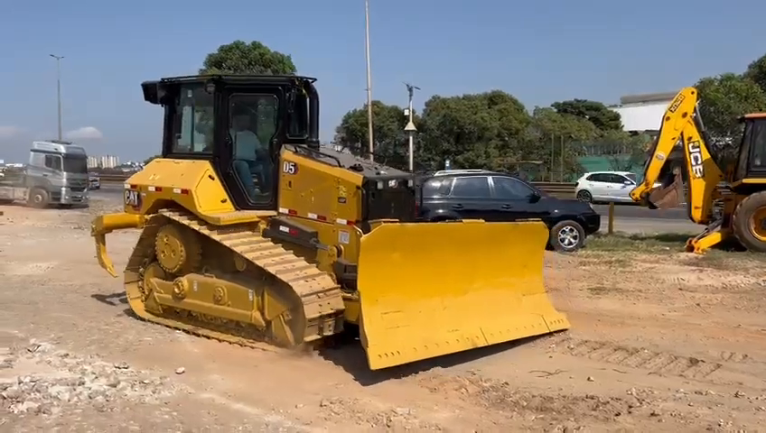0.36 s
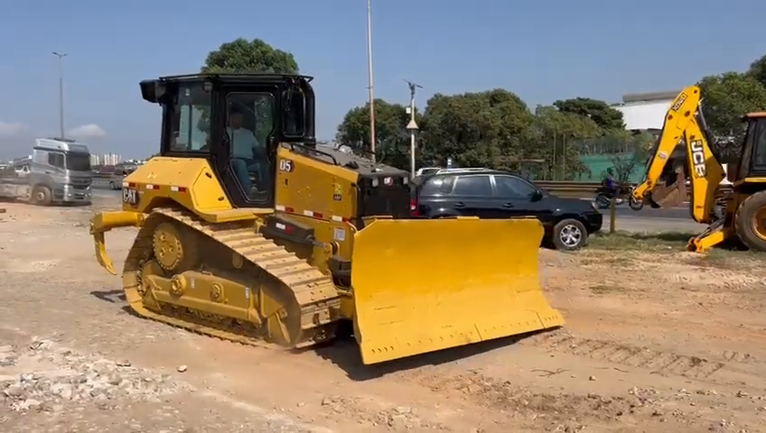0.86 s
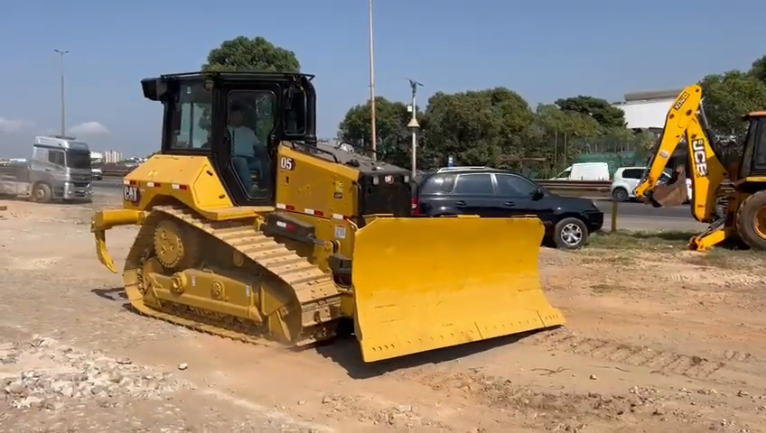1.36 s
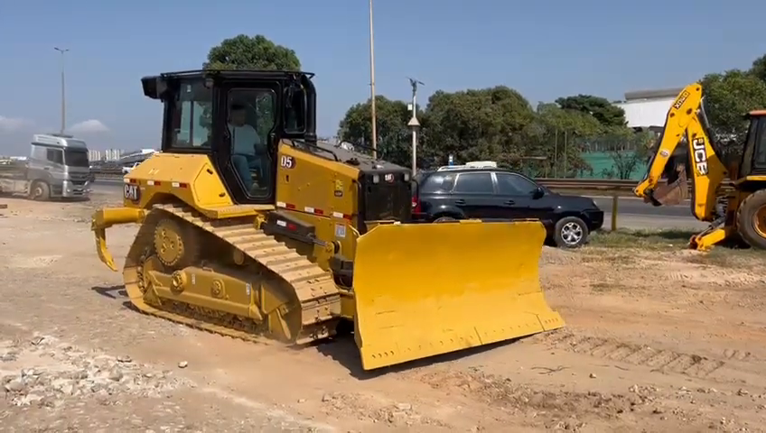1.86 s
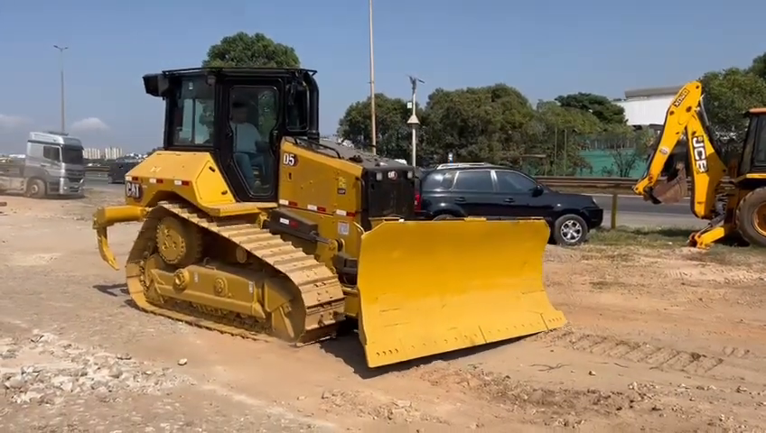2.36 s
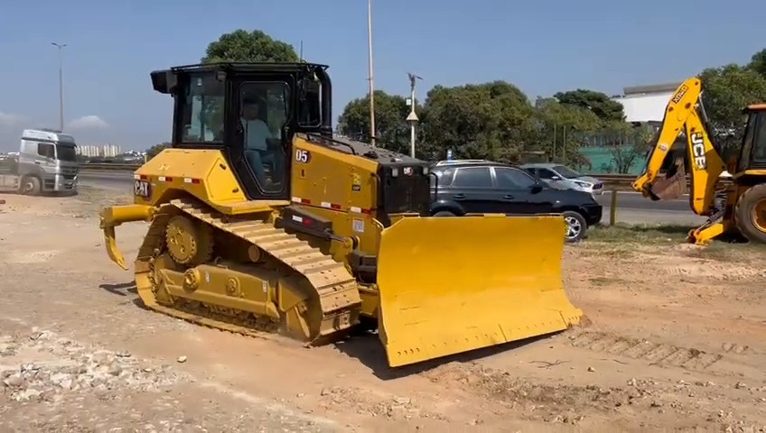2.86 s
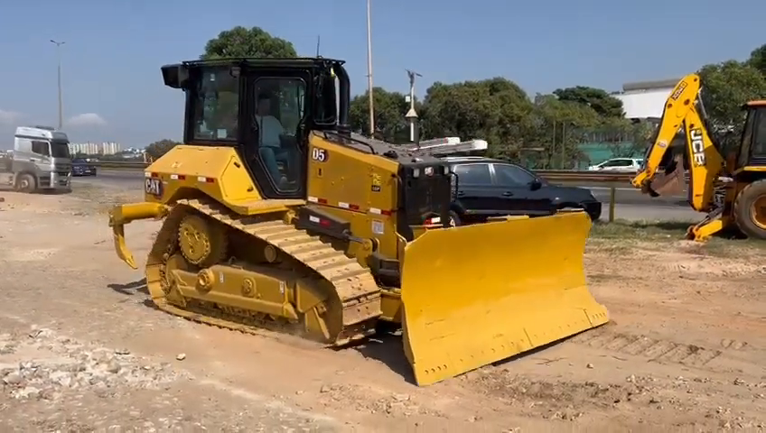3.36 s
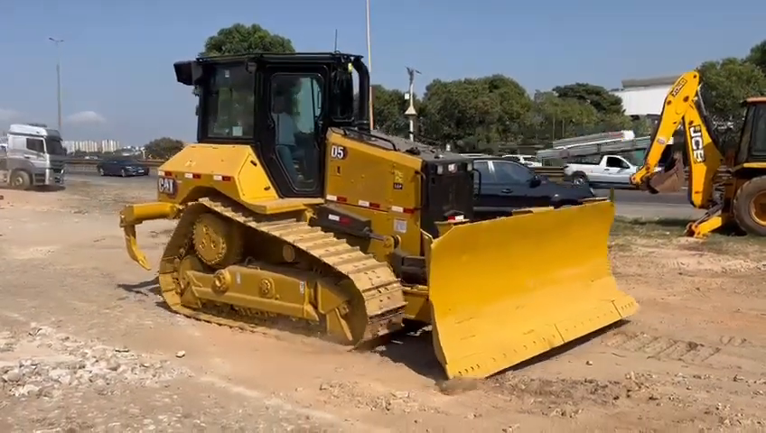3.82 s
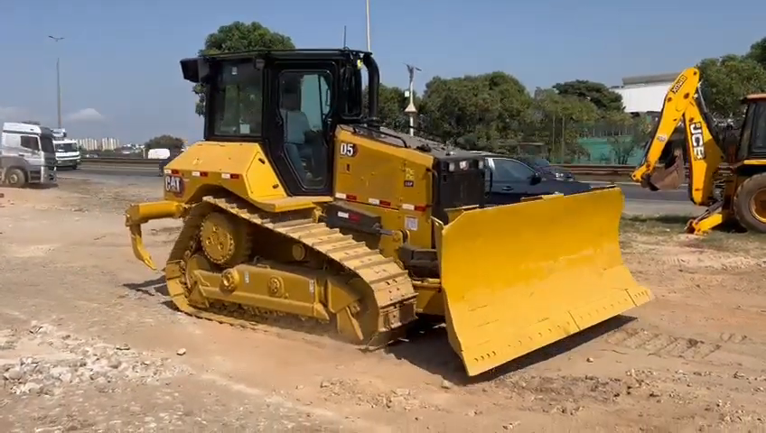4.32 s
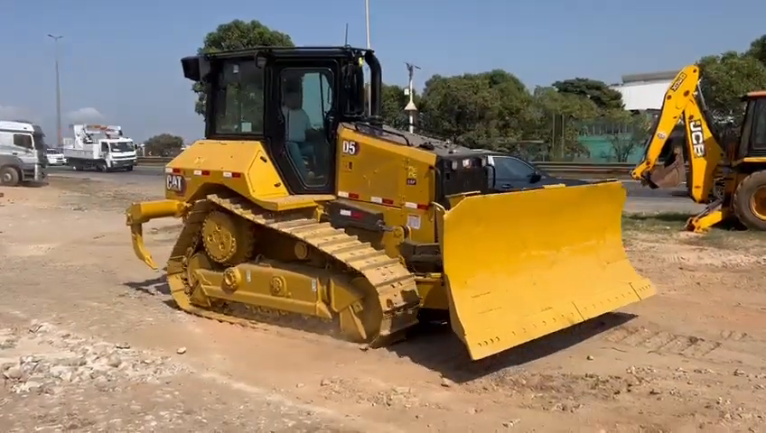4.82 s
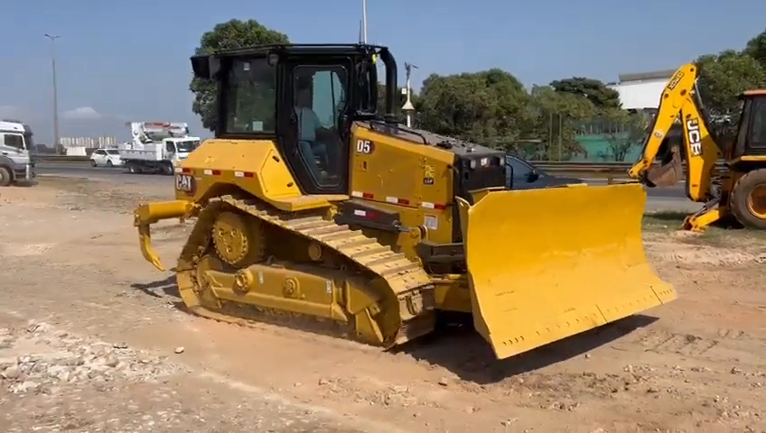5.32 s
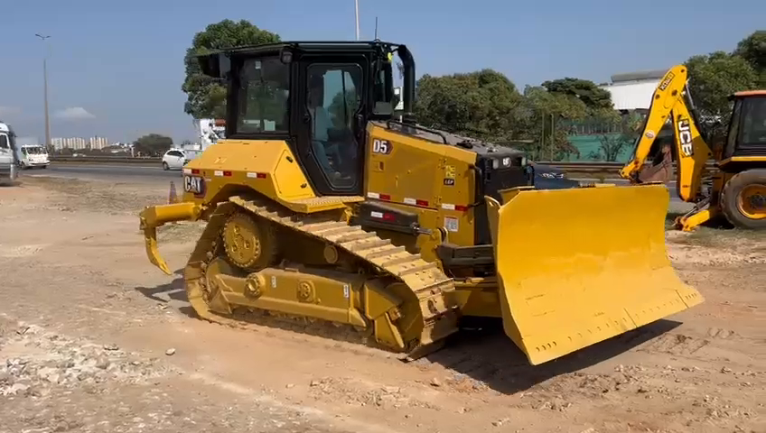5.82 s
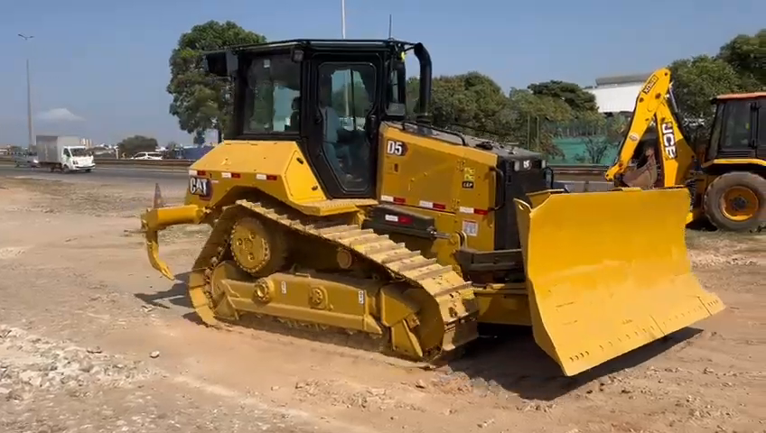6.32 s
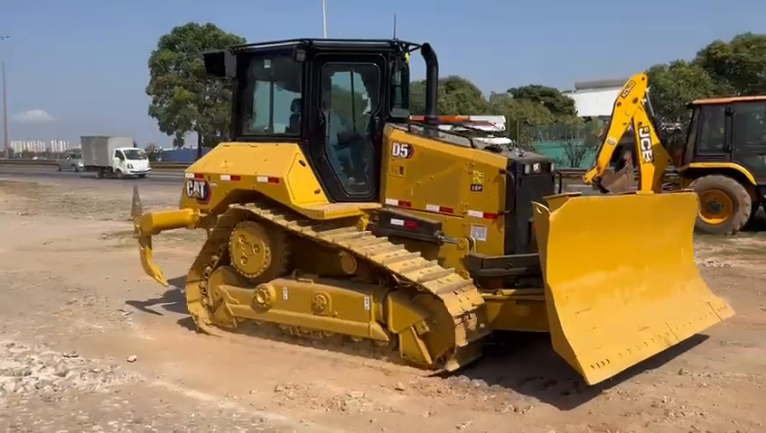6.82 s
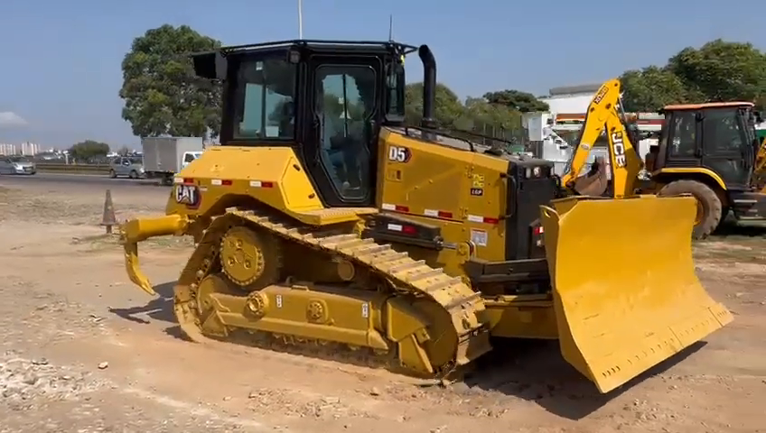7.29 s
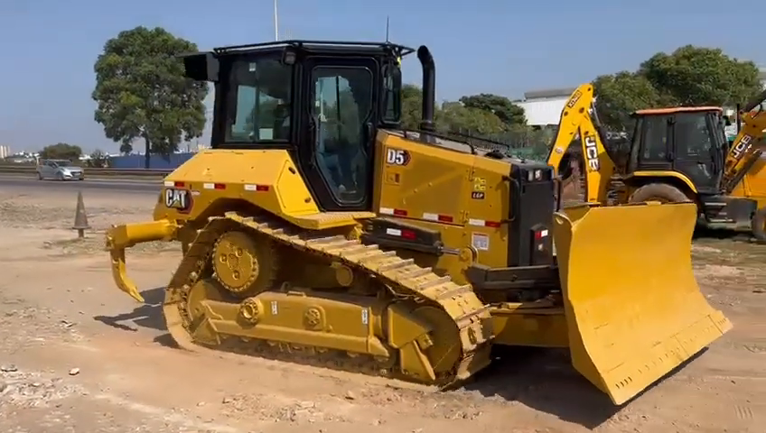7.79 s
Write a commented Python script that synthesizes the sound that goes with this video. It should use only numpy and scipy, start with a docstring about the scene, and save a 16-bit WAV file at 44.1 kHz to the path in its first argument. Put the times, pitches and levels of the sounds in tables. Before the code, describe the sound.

A tracked dozer works on an open dirt yard, heard in stereo from some metres away. From 0 s its diesel roars at high revs with a buzzing gear whine, thin turbo whistle and a couple of light track clicks. At about 1.1 s it surges briefly, then the pitch slides down until 2 s, exhaust beat thinning; a dull thud lands at 1.7 s. From 2.2 s the engine pulls at a steady, lower, rough growl over ground rumble and hiss. Around 3 s track links clank and chirp in a cluster; at 3.6-4 s a dry pin squeals amid hard clanks, low thuds and hydraulic whine, with hiss and rasping fading by 5 s. Knocks and a sharp stone crack come at 5.9-6.5 s. Gear whine returns, small squeaks sound near 7.7 s, a tiny air puff at 7.9 s, and the engine continues to the end.

```python
"""On a dirt yard, a tracked dozer with a six-cylinder turbo diesel manoeuvres some metres away.
The engine drops from high revs, settles and pulls: sines at multiples of its firing rate over a noise roar.
Pumps and gears sing on the same phase; a turbo whistles on its own. Track links clank as struck modes,
dry pins squeal and squeak as sliding sines, panels ring as resonances in noise, stones snap as
filtered clicks, and the frame thuds as decaying sine and noise bursts."""
import sys
import numpy as np
from scipy import signal
from scipy.fft import rfft, irfft, next_fast_len
from scipy.io import wavfile
from scipy.ndimage import uniform_filter1d

SR = 44100
rng = np.random.default_rng(int(sys.argv[2]) if len(sys.argv) > 2 else 0)


def materialize(psi):
    """Save the field psi as 16-bit PCM at rate SR to the path in sys.argv[1].

    A 1-D psi becomes a single channel; in a 2-D psi each row is a channel.
    """
    bounded = np.clip(np.atleast_2d(psi).T, -1, 1)
    quanta = np.round(bounded * 32767).astype(np.int16)
    wavfile.write(sys.argv[1], SR, quanta)


def invert_db(x):
    """Field ratio 10**(x/20) for x, a level in decibels (scalar or array-like)."""
    u = np.asarray(x, float) / 20
    return 10 ** u


N = 360297


def rms_one(x):
    """Normalisation: scales a signal to unit root mean square."""
    return x / np.sqrt(np.mean(x ** 2) + 1e-20)


def in_time(rows, fade_s=0.03):
    """Linear interpolation: each column at every sample, then a gate that is open while the curve lasts."""
    s, *columns = np.transpose(rows)
    t = np.arange(N) / SR
    gate = np.clip(np.minimum(t - s[0], s[-1] - t) / fade_s + 1, 0, 1)
    return [np.interp(t, s, c) for c in columns] + [gate]


def at_hz(points, hz):
    """Logarithmic pitch: interpolates a curve of (frequency [Hz], value) along log frequency."""
    points = np.array(points)
    return np.interp(np.log(hz + 1), np.log(points[:, 0] + 1), points[:, 1])


def band_pass(order, edges_hz, x):
    """Butterworth filtering: passes the band between two edges."""
    return signal.sosfilt(signal.butter(order, edges_hz, "band", fs=SR, output="sos"), x)


def low_pass(order, edge_hz, x):
    """Butterworth filtering: passes what lies below the edge."""
    return signal.sosfilt(signal.butter(order, edge_hz, fs=SR, output="sos"), x)


def drift(rate):
    """Low-passed chance: noise through a double pole at rate [Hz], spread 1, drawn every 40 samples."""
    r = np.exp(-80 * np.pi * rate / SR)
    noise = rng.standard_normal(N // 40 + 2002)
    slow = signal.lfilter([1], [1, -2 * r, r * r], noise)[2000:]
    return np.interp(np.arange(N) / 40, np.arange(len(slow)), rms_one(slow))


def tone(turns, level_db, waver_db, wobble):
    """Phase accumulation: a sine of running turns, with level [dB rms] and phase [radians] unsteady."""
    phase = 2 * np.pi * (turns + rng.random()) + wobble * drift(14.0)
    return np.sqrt(2) * invert_db(level_db + waver_db * drift(14.4)) * np.sin(phase)


def ring(clicks, hz, t60):
    """Damped resonance: a unit click sets off a sine of height 1 that falls 60 dB in t60 [s]."""
    r, w = invert_db(-60 / (t60 * SR)), 2 * np.pi * hz / SR
    return signal.lfilter([0, np.sin(w)], [1, -2 * r * np.cos(w), r * r], clicks + 1e-18)


def spells(rows):
    """Gating: dB curves of tones that sound in spells and are faint between, one per level column."""
    t = np.arange(N) / SR
    out = np.full((len(rows[0]) - 2, N), invert_db(-55.5))  # faint level between spells
    for start, end, *levels_db in rows:
        gate = np.clip(np.minimum(t - start, end - t) / 0.016 + 1, 0, 1)
        out += invert_db(np.array(levels_db))[:, None] * gate
    return 20 * np.log10(out)


# left-right likeness of the noises: (frequency [Hz], correlation [0-1])
NOISE_LIKENESS = [(60, 1), (125, 1), (250, 1), (500, 0.93), (1100, 0.24), (1500, 0.61), (2500, 0.42),
                  (5000, 0.87), (6600, 0.24), (7000, 1), (9000, 0.89), (11000, 1)]


def banded_noise(spectrum, patchy_db):
    """Partial coherence: stereo noise in six overlapping log bands that flicker separately; rms 1."""
    hz = np.fft.rfftfreq(N, 1 / SR)
    mid, side = rfft(rng.standard_normal((2, N))) * invert_db(at_hz(spectrum, hz))
    alike = np.clip(at_hz(NOISE_LIKENESS, hz), 0, 1)
    pair = np.sqrt(1 + alike) * mid + np.sqrt(1 - alike) * side * [[1], [-1]]
    low, high = spectrum[0][0], spectrum[-1][0]
    place = np.log2(np.clip(hz, low, high) / low) / np.log2(high / low) * 5
    out, together = 0, drift(2.0)
    for k in range(6):
        share = np.cos(np.pi / 2 * np.clip(place - k, -1, 1)) ** 2
        flicker = invert_db(patchy_db * (0.35 * together + drift(15)))
        out = out + flicker * irfft(pair * share * (hz < high), N)
    return rms_one(out)


# engine speed: (time [s], firing rate [1/s])
FIRING_RATE = [(0.0, 84.3), (0.6, 83.6), (0.82, 82.8), (0.95, 84.5), (1.07, 89.5), (1.15, 92.5),
               (1.2, 91.4), (1.4, 84.5), (1.6, 76.7), (1.8, 70.2), (2.0, 67.0), (2.2, 66.7), (2.5, 68.7),
               (3.0, 70.2), (3.4, 69.7), (3.8, 70.1), (4.25, 69.3), (5.0, 70.4), (5.35, 71.5), (5.8, 70.5),
               (6.3, 70.3), (6.8, 69.5), (8.17, 69.9)]
# engine effort: (time [s], exhaust beat at the firing rate [dB rms], roar reference [dB])
ENGINE_EFFORT = [(0.0, -18, -22), (0.8, -19.5, -23.5), (0.97, -21, -22.5), (1.13, -15.5, -20.5),
                 (1.18, -20, -27), (1.21, -52, -26.5), (1.8, -49, -27), (2.0, -30, -27), (2.18, -22.5, -25),
                 (2.8, -28, -22.5), (3.7, -23.5, -19.5), (4.4, -21.5, -21), (5.35, -22.5, -21.5),
                 (6.1, -20, -19), (6.42, -23.5, -18.5), (6.8, -20.5, -21.5), (8.17, -19, -20)]
# upper tones of exhaust and pump: (time [s], level at 2, 3, 4 and 5 times the firing rate [dB]);
# the pump plays the column at 3 times, scaled by the fuelling
UPPER_TONES = [(0.0, -48, -36.5, -43, -64), (1.0, -37, -33, -34, -39), (1.3, -41, -52, -64, -49),
               (1.85, -33, -40, -43, -61), (2.2, -29, -30.5, -25.5, -28.5), (3.0, -27.5, -44, -40, -33.5),
               (3.25, -24.5, -28.5, -33.5, -40), (3.8, -29.5, -19.5, -33.5, -33),
               (3.95, -26.5, -61, -33.5, -40), (5.0, -28, -37, -28.5, -38), (5.35, -42, -41, -32.5, -46),
               (6.2, -34, -31.5, -31.5, -46), (6.75, -34.5, -30, -27, -32), (8.17, -25.5, -32, -29.5, -39)]
# uneven cylinders, scaled by the fuelling: (multiple of crank speed,
# level against the roar reference at high revs [dB], at working revs [dB])
CRANK_ORDERS = [(5, -13, -13.5), (7, -28, -20.5), (10, -10.5, -19), (11, -21, -14), (13, -23, -10.5),
                (14, -24, -14)]


def diesel():
    """Harmonic orders: exhaust sines locked to the firings; also gives firings, fuelling 0.1-1 and roar."""
    rate, _ = in_time(FIRING_RATE)
    first_db, roar_db, _ = in_time(ENGINE_EFFORT)
    second_db, _, fourth_db, fifth_db, _ = in_time(UPPER_TONES)
    firings = np.cumsum(rate) / SR
    fuel = np.clip((uniform_filter1d(first_db, size=4000) + 40) / 10, .1, 1)
    out = tone(firings, first_db, waver_db=1.2, wobble=.08)
    out += tone(2 * firings, second_db, waver_db=1.5, wobble=.2)
    out += tone(4 * firings, fourth_db, waver_db=1.5, wobble=.25)
    out += tone(5 * firings, fifth_db, waver_db=1.5, wobble=.25)
    crank_turns = firings / 3  # three firings to a turn
    fast = np.clip((rate - 72) / 10, 0, 1)
    for multiple, fast_db, slow_db in CRANK_ORDERS:
        level_db = roar_db + fast * fast_db + (1 - fast) * slow_db
        out += fuel * tone(multiple * crank_turns, level_db, waver_db=2, wobble=.3)
    return out, firings, fuel, roar_db


# roar spectrum: (frequency [Hz], relative density [dB per Hz])
ROAR_SPECTRUM = [(120, -13.5), (200, 0.5), (227, -4.5), (278, -4), (470, -7.5), (667, -5.5), (847, -14.5),
                 (999, -15), (1470, -18), (1800, -18), (2340, -29), (3960, -120)]


def roar(roar_db, throb):
    """Amplitude modulation: broadband engine noise that throbs slightly with the firings."""
    return invert_db(roar_db - 4.0) * (1 + 0.014 * throb) * banded_noise(ROAR_SPECTRUM, patchy_db=1.67)


def knock(firings, fuel, roar_db):
    """Impulse excitation: combustions rap the block unevenly, harder at high revs; it rings near 1 kHz."""
    fired = np.diff(np.floor(firings), prepend=0) * rng.normal(0.1, 1, N)
    revs_db = 71.0 * np.log10(in_time(FIRING_RATE)[0] / 70)
    block = ring(ring(fired, hz=991, t60=0.037), hz=1020, t60=0.0054)
    return fuel * invert_db(roar_db - 22.5 + revs_db) * rms_one(block)


# the pump works against pressure, levels scaled by the fuelling:
# (start [s], end [s], level at 6 times the firing rate [dB], at 9 times [dB])
PUMP_PRESSURE = [(3.15, 3.5, -35, -35.5), (3.56, 5.1, -26, -31), (6.3, 6.8, -49, -39)]


def pump(firings, fuel):
    """Harmonic series: piston pulses in the hydraulic lines, three to a firing, and their overtones."""
    levels_db = [in_time(UPPER_TONES)[1], *spells(PUMP_PRESSURE)]
    pulses = 3 * firings
    series = sum(tone((k + 1) * pulses, db, waver_db=1.3, wobble=.25) for k, db in enumerate(levels_db))
    return fuel * series


# high engine-locked whines: (start [s], end [s], multiple of the firing rate, level [dB rms])
HIGH_WHINES = [(0.45, 0.897, 15, -43), (3.56, 4.496, 18, -46.5), (5.03, 5.15, 20, -50)]


def high_whines(firings):
    """Phase locking: thin tones at high multiples of the firing rate that come and go."""
    out = np.zeros(N)
    for start, end, multiple, level_db in HIGH_WHINES:
        gate = in_time([(start,), (end,)])[0]
        out += gate * tone(multiple * firings, level_db, waver_db=7.5, wobble=0.25)
    return out


# gear whine: (start [s], end [s], level [dB rms])
GEAR_SPELLS = [(0.0, 0.95, -33), (1.2, 1.45, -34.5), (1.5, 1.75, -39), (1.9, 2.28, -36.5), (3.2, 5.05, -46),
               (6.55, 8.17, -33)]


def gear_whine(firings):
    """Gear meshing: a tone locked to 8 times the firing rate, in spells."""
    return tone(8 * firings, spells(GEAR_SPELLS)[0], waver_db=1.5, wobble=.35)


# turbo whistle: (time [s], frequency [Hz], level before a 2 dB cut [dB])
TURBO_WHISTLE = [(0, 12200, -55), (.88, 11880, -53), (1.02, 12300, -60), (1.17, 12300, -60),
                 (1.28, 11250, -54), (1.45, 10150, -62), (1.7, 8800, -60), (1.9, 8330, -53),
                 (2.03, 8180, -62), (2.13, 8230, -53), (2.4, 8620, -55), (2.95, 9300, -58),
                 (4.2, 10100, -62), (5.25, 10500, -58), (5.95, 9900, -60), (6.5, 9400, -64),
                 (8.17, 9780, -64)]


def turbo():
    """Frequency modulation: a high whistle, gliding and jittering in pitch and flickering in level."""
    hz, level_db, _ = in_time(TURBO_WHISTLE)
    turns = np.cumsum(hz * (1 + .0015 * drift(40))) / SR
    return tone(turns, level_db - 2 + 3 * drift(25), waver_db=4, wobble=.4)


# panel resonances: (frequency [Hz], width [Hz], level against the roar reference [dB])
PANELS = [(552.3, 43, -15), (680, 39, -17), (1016, 79, -22)]


def housing(roar_db):
    """Driven resonance: panels ring as narrow wavering bands of noise that follow the roar."""
    air = rng.standard_normal(N)
    out = np.zeros(N)
    for hz, width, level_db in PANELS:
        panel = ring(ring(air, hz, 1.57 / width), hz, 1.57 / width)
        out += invert_db(roar_db + level_db + 4.8 * drift(4.7)) * rms_one(panel)
    return out


# track links knock and rattle: (time [s], ring before a 27 dB cut [dB], ring frequency [Hz],
# grit before its envelope [dB], rattle length [s])
LINK_CLANKS = [(0.151, -11, 4900, -43, 0.02), (0.316, -25.5, 3820, -46, 0.23),
               (1.87, -43, 2870, -40.5, 0.065), (2.507, -26, 4900, -42, 0.028),
               (2.816, -29, 3200, -38.5, 0.043), (2.858, -26, 3540, -31, 0.034),
               (2.956, -14, 4550, -38, 0.016), (3.001, -21, 4200, -34, 0.027),
               (3.025, -26, 4000, -32, 0.016), (3.026, -26, 7600, -21.5, 0.0091),
               (3.045, -15, 4450, -38, 0.013), (3.136, -21, 1700, -32.5, 0.014),
               (3.396, -13, 2830, -36, 0.03), (3.475, -24, 4700, -34, 0.022),
               (3.767, -10, 4840, -37, 0.022), (3.792, -9, 5100, -34, 0.019),
               (3.898, -27, 4300, -35, 0.042), (3.94, -26, 4800, -36, 0.069),
               (4.926, -32, 2150, -31, 0.014), (5.94, -15.5, 2630, -50, 0.016),
               (6.108, -17, 3750, -35, 0.0086), (6.399, -28, 2200, -36, 0.017),
               (6.419, -30, 1400, -35.5, 0.036), (6.471, -25, 2040, -41, 0.02),
               (6.532, -42, 4200, -39, 0.042), (7.664, -30, 2980, -39.5, 0.043),
               (7.687, -26, 3580, -36, 0.047), (7.847, -40, 2660, -37.5, 0.038),
               (7.899, -36, 4300, -31.5, 0.018)]
# modes of the track steel: (frequency [Hz], relative level [dB], 60 dB decay time [s])
LINK_MODES = [(1657, 5, 0.13), (2050, 6.5, 0.051), (2270, 4.5, 0.077), (2890, 8, 0.011), (3400, 6, 0.012),
              (3890, 10, 0.011), (4200, 0, 0.031), (4670, -1, 0.022), (4900, 0.5, 0.02), (5530, -2, 0.022),
              (7140, 5.5, 0.0074), (8250, 8, 0.0074), (8570, 5, 0.024)]


def tracks():
    """Modal excitation: each clank's contacts ring the modes near its pitch most, under a scrape of grit."""
    contacts = 0.74 * rng.standard_normal(N) * (rng.random(N) < 4000 / SR)  # 4000 per s
    luck = rng.normal(0, 3, (len(LINK_CLANKS), len(LINK_MODES)))  # dB
    sand = rng.standard_normal(N) * invert_db(1.5 * drift(200))
    out, drives, t = np.zeros(N), np.zeros((len(LINK_MODES), N)), np.arange(SR // 5) / SR
    for (s, ring_db, ring_hz, grit_db, length_s), chance_db in zip(LINK_CLANKS, luck):
        at = round(s * SR)
        span = slice(at, at + len(t))
        shape = np.exp(-(t / length_s) ** 2)
        grit = rms_one(band_pass(2, [ring_hz / 1.7, ring_hz * 1.7], sand[span]))
        out[span] += invert_db(grit_db) * shape * (1 - np.exp(-t / 0.007)) * grit
        rattle = shape * contacts[span]
        rattle[0] += 0.7  # first knock
        for drive, (hz, _, _), extra_db in zip(drives, LINK_MODES, chance_db):
            near = invert_db(ring_db - 27.0) * np.exp(-(np.log2(hz / ring_hz) / 0.19) ** 2)
            drive[span] += rattle * (near + invert_db(grit_db - 23.0 + extra_db))
    for drive, (hz, level_db, t60) in zip(drives, LINK_MODES):
        out += ring(drive * invert_db(level_db), hz, t60)
    return low_pass(4, 9500, out)


def ticks(hiss_db):
    """Random impulses: loose links tick faintly all the time, each contact ringing one steel mode."""
    heights = invert_db(3 * np.minimum(rng.exponential(1, N), 3))
    sizes = heights * (rng.random(N) < 150 / SR)  # 150 ticks per s
    dealt = rng.integers(0, len(LINK_MODES), N)
    rings = np.zeros(N)
    for k, (hz, level_db, t60) in enumerate(LINK_MODES):
        rings += ring(sizes * (dealt == k) * invert_db(level_db), hz, t60)
    return invert_db(hiss_db - 14) * rms_one(low_pass(2, 6000, rings))


# a dragged shoe rasps as the turn ends: (time [s], level [dB rms])
SHOE_RASP = [(4.15, -42), (4.6, -43.5), (5.1, -46)]


def rasp():
    """Friction noise: a dragged shoe as noise through one resonance, wavering in level."""
    level_db, gate = in_time(SHOE_RASP)
    width_hz = 240
    scrape = rms_one(ring(rng.standard_normal(N), 2690, 2.2 / width_hz))
    return gate * invert_db(level_db + 2 * drift(14)) * scrape


# a track pin in the turn: (time [s], frequency [Hz], level [dB], octave level [dB]),
# both levels before a wavering grip that averages -3 dB
PIN_SQUEAL = [(3.57, 2830, -46, -50), (3.65, 2900, -44, -46), (3.77, 2840, -41, -50), (3.9, 2870, -39, -50),
              (4.0, 2830, -49, -55)]


def squeal():
    """Stick-slip: a pin squeals as a rough tone and its octave, jittering in pitch and grip."""
    hz, low_db, high_db, gate = in_time(PIN_SQUEAL)
    turns = np.cumsum(hz * (1 + .007 * drift(120))) / SR
    grip = invert_db(5 * drift(16) - 3)
    low = tone(turns, low_db, waver_db=1.5, wobble=.4)
    high = tone(2 * turns, high_db, waver_db=1.5, wobble=.4)
    return gate * grip * (low + high)


# dry pins squeak: (time [s], length [s], start frequency [Hz], end frequency [Hz],
# level before the envelope [dB])
PIN_CHIRPS = [(0.384, 0.019, 3810, 3880, -26.5), (2.851, 0.018, 5500, 5480, -32),
              (2.858, .018, 7600, 7600, -36), (3.011, 0.006, 2300, 2180, -15.5),
              (3.012, 0.011, 4130, 4080, -23), (3.025, 0.011, 2250, 1990, -19),
              (3.029, .016, 4020, 3850, -29), (3.042, .022, 4900, 4850, -35),
              (3.044, 0.0097, 1730, 1700, -28), (3.053, 0.032, 3900, 3920, -36),
              (3.286, 0.1, 4740, 4800, -39), (3.39, .03, 2850, 2820, -33),
              (3.893, 0.016, 5300, 5400, -28.5), (4.926, .009, 4050, 4070, -31),
              (5.219, .008, 5080, 5050, -33), (6.108, .006, 5400, 5300, -35),
              (6.394, 0.007, 2210, 2210, -29), (6.403, 0.012, 5400, 5400, -28),
              (6.47, .014, 2030, 2040, -36), (6.535, 0.049, 6900, 6900, -45),
              (7.177, 0.014, 3850, 3870, -31), (7.66, 0.031, 2780, 2790, -38),
              (7.7, 0.049, 2790, 2780, -28.5), (7.698, 0.034, 2100, 2070, -29),
              (7.702, .025, 3220, 3200, -33), (7.712, 0.065, 3820, 3840, -37)]


def chirps():
    """Frequency glide: short, nearly clean squeaks that start fast, hold, slide a little and fade."""
    out, rough = np.zeros(N), drift(110)
    t = np.arange(round(.2 * SR)) / SR
    for s, length_s, start_hz, end_hz, level_db in PIN_CHIRPS:
        at = round(s * SR)
        span = slice(at, at + len(t))
        shape = (1 - np.exp(-t / 0.003)) * np.exp(-(t / length_s) ** 3)
        hz = start_hz + (end_hz - start_hz) * np.minimum(t / length_s, 1)
        phase = 2 * np.pi * np.cumsum(hz) / SR + .4 * rough[span]
        out[span] += invert_db(level_db + 2.5 * rough[span]) * shape * np.sin(phase)
    return out


# high hiss while the machine steers: (time [s], level [dB rms])
STEERING_LEVEL = [(3.75, -42.5), (3.9, -48.5), (4.4, -43), (4.6, -49)]
# its notes: (frequency [Hz], width [Hz], relative level [dB])
STEERING_NOTES = [(6800, 48, -13), (7000, 110, -9), (7250, 33, -4), (7600, 36, -5), (8040, 84, -4)]


def steering():
    """Resonant filtering: one noise through narrow resonances makes a high chord of hiss."""
    level_db, gate = in_time(STEERING_LEVEL)
    air = rng.standard_normal(N)
    chord = sum(invert_db(db) * rms_one(ring(air, hz, 2.2 / width)) for hz, width, db in STEERING_NOTES)
    return gate * invert_db(level_db) * rms_one(band_pass(4, [6300, 8700], chord))


# stones crack under a shoe: (time [s], click level before gain and filter [dB])
STONE_SNAPS = [(3.2465, -16), (6.1704, -7.5)]


def snaps():
    """Brittle fracture: a bright crack of about a millisecond with a short gritty tail."""
    clicks = np.zeros(N)
    clicks[[round(s * SR) for s, _ in STONE_SNAPS]] = invert_db(np.array(STONE_SNAPS)[:, 1])
    decay = signal.lfilter([0, 1], [1, -invert_db(-60 / (0.03 * SR))], clicks)
    tail = decay * rng.standard_normal(N)
    return band_pass(2, [3800, 9800], invert_db(15.0) * clicks + invert_db(-12) * tail)


# frame thuds: (time [s], level before the envelope [dB], frequency [Hz], decay time constant [s])
FRAME_THUDS = [(1.698, -18, 600, 0.035), (1.716, -7.5, 244, 0.0068), (1.733, -22, 614, 0.012),
               (2.817, -18, 710, 0.0077), (3.03, -9, 137.4, 0.028), (3.769, -9.5, 230, 0.031),
               (3.9, -9, 91, 0.058), (3.933, -13, 218, 0.046), (3.955, -11, 149, .03),
               (4.517, -21, 594, .01), (5.94, -11.5, 520, 0.014), (6.11, -16.5, 627, 0.028),
               (6.249, -11, 400, 0.011), (6.38, -16, 600, .012), (6.439, -14, 680, 0.014),
               (6.457, -15, 720, 0.011), (7.422, -19, 590, 0.012)]


def thuds():
    """Damped impact: a dull burst that rings briefly at the pitch of the part that was struck."""
    out, t = np.zeros(N), np.arange(round(.25 * SR)) / SR
    noise = rng.standard_normal((len(FRAME_THUDS), len(t)))
    for (s, level_db, hz, decay_s), shake in zip(FRAME_THUDS, noise):
        dull = band_pass(2, [hz / 2.5, hz * 2.5], shake)
        body = 0.62 * np.sin(2 * np.pi * hz * t) + 0.38 * rms_one(dull)
        at = round(s * SR)
        shape = (1 - np.exp(-t / 0.0009)) * np.exp(-t / decay_s)
        out[at:at + len(t)] += invert_db(level_db) * body * shape
    return out


# a thin high puff of air: (time [s], level [dB rms])
AIR_PUFF = [(7.85, -42), (7.87, -45), (7.91, -46), (7.94, -62)]


def puff():
    """Uncorrelated noise: a bright puff of air, different at each side."""
    level_db, gate = in_time(AIR_PUFF, fade_s=0.011)
    air = band_pass(4, [10600, 11800], rng.standard_normal((2, N)))
    return gate * invert_db(level_db) * rms_one(air)


# fan and track hiss spectrum: (frequency [Hz], relative density [dB per Hz])
HISS_SPECTRUM = [(700, -2.5), (1100, -0.5), (1480, -7.5), (2200, -8), (4400, -13), (5600, -16), (6300, -21),
                 (8000, -19), (8850, -20.5), (9150, -36), (10100, -42), (10500, -27.5), (11650, -24),
                 (11800, -72)]


def hiss(hiss_db, throb):
    """Amplitude modulation: fan and track noise that throbs slightly with the firings."""
    return invert_db(hiss_db + 2.0) * (1 + 0.024 * throb) * banded_noise(HISS_SPECTRUM, patchy_db=1.44)


# spectra of ground rumble and of track rollers: (frequency [Hz], relative density [dB per Hz])
RUMBLE_SPECTRUM = [(12, -67), (25, -33), (40, 7), (58, 12), (80, 6), (110, -40)]
ROLLER_SPECTRUM = [(45, -32), (65, 6), (110, 7), (190, -5.5), (280, -11)]


def ground(rumble_db, rollers_db):
    """Rolling noise: patchy low bands of noise for the ground and the track rollers."""
    rumble = invert_db(rumble_db - 0.5) * banded_noise(RUMBLE_SPECTRUM, patchy_db=6.0)
    return rumble + invert_db(rollers_db + 9.5) * banded_noise(ROLLER_SPECTRUM, patchy_db=3.5)


def yard(x):
    """Early reflection: eight dull echoes off ground and parked machines, different at each ear."""
    dull, out = signal.lfilter([.55], [1, -.45], x), np.zeros((2, N))
    lags = (rng.uniform(0.0025, .03, 8) * SR).astype(int)
    for k, lag in enumerate(lags):
        out[k % 2, lag:] += dull[:-lag] * (-1) ** (k // 2)
    return out


# track travel, reference levels before each layer's trim:
# (time [s], fan and track hiss [dB], ground rumble [dB], track rollers [dB])
TRACK_TRAVEL = [(0.0, -34, -35, -41), (0.8, -35, -40, -46), (1.05, -32.5, -35, -32),
                (1.36, -38, -48, -41.5), (2.1, -39.5, -26, -39), (2.8, -37.5, -35, -49),
                (3.4, -31, -29, -32.5), (3.8, -32, -34, -34), (3.94, -32, -24, -31), (4.5, -32, -28, -32.5),
                (5.05, -34.5, -25.5, -39), (5.7, -38.5, -32, -51), (6.3, -36, -26.5, -30.5),
                (6.9, -38, -25.5, -33), (7.2, -36, -22, -28.5), (7.6, -37.5, -25, -38.5),
                (8.17, -36, -22, -34)]


def scene():
    """Superposition: engine, pumps, tracks and their noises add; the metal also echoes in the yard."""
    hiss_db, rumble_db, rollers_db, _ = in_time(TRACK_TRAVEL)
    exhaust, firings, fuel, roar_db = diesel()
    throb = np.cos(2 * np.pi * firings)
    engine = exhaust + knock(firings, fuel, roar_db) + housing(roar_db)
    whines = pump(firings, fuel) + high_whines(firings) + gear_whine(firings) + turbo()
    friction = squeal() + chirps() + steering()
    metal = tracks() + ticks(hiss_db) + rasp()
    noises = roar(roar_db, throb) + hiss(hiss_db, throb) + ground(rumble_db, rollers_db) + puff()
    return engine + whines + friction + thuds() + snaps() + metal + invert_db(-9.0) * yard(metal) + noises


def band_limit(x):
    """A steep low-pass at the top of the band."""
    return signal.sosfilt(signal.butter(12, 13060, fs=SR, output="sos"), x)


# microphone pair: (frequency [Hz], left over right [dB])
PORT_TILT = [(300, -.5), (640, .6), (1160, 2), (2100, 4.5), (3800, 6.5), (6900, 3.5), (9000, 0)]
# microphone pair: (frequency [Hz], phase by which left leads [radians]), more near 1500 Hz at first
PORT_LEAD = [(30, .07), (70, .09), (150, .22), (300, .3), (600, .45), (1030, .9), (1290, 1.8), (1520, 1.9),
             (1850, 1.3), (2240, .6), (4820, -.1), (5770, -.9), (6200, -1.3), (6900, 0), (8000, -.1),
             (8600, -1.4), (9100, -3.05), (9900, -3.3), (10500, -4.8), (11000, -6.1), (12200, -6.8)]


def record(dry):
    """Interaural difference: two microphone ports differ in level and phase with pitch and bearing."""
    size = next_fast_len(N + 4096)
    hz = np.fft.rfftfreq(size, 1 / SR)
    half = invert_db(at_hz(PORT_TILT, hz) / 2) * np.exp(1j * at_hz(PORT_LEAD, hz) / 2)
    # as the machine turns, an extra lead of 0.9 radians around 1500 Hz shrinks away
    bump = np.exp(-(np.log2((hz + 1) / 1500) / .18) ** 2)  # width in octaves
    more = np.exp(.5j * .9 * bump)
    after = rfft(dry, size) * [half, 1 / half] * (hz < 12350)
    before = after * [more, 1 / more]
    turned = np.interp(np.arange(N) / SR, [2.8, 3.3], [0, 1])
    ports = turned * irfft(after, size)[:, :N] + (1 - turned) * irfft(before, size)[:, :N]
    return band_limit(ports)


dry = scene()
out = record(dry)
materialize(out)
```